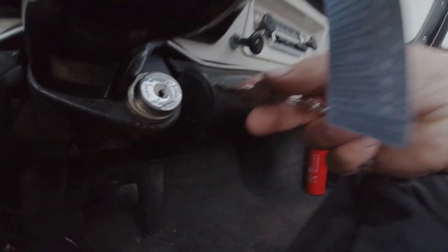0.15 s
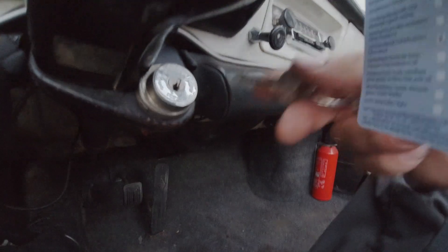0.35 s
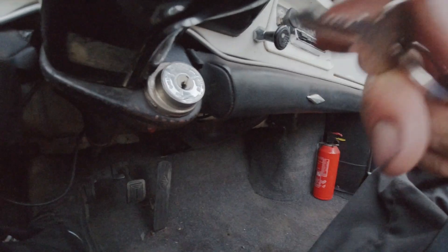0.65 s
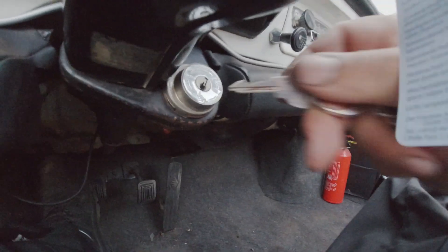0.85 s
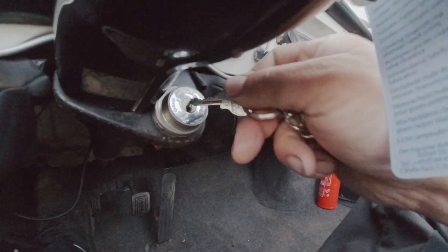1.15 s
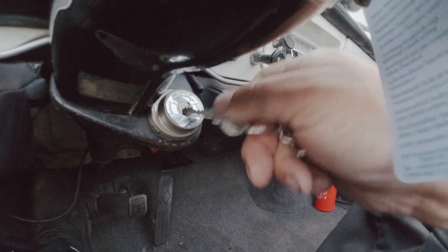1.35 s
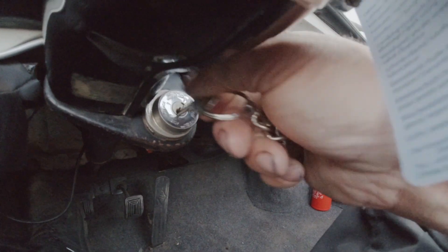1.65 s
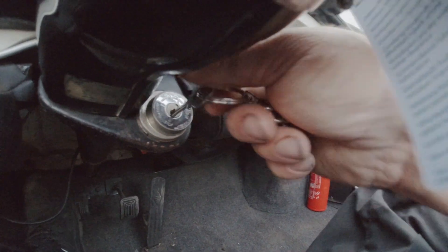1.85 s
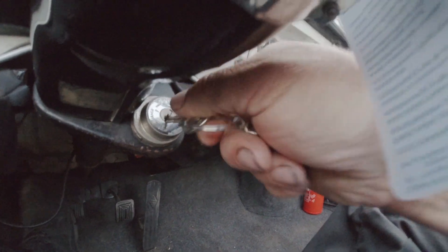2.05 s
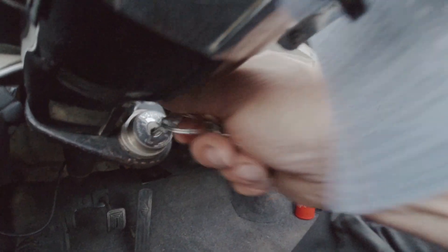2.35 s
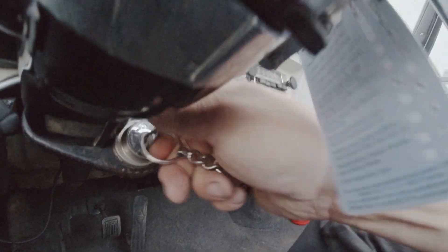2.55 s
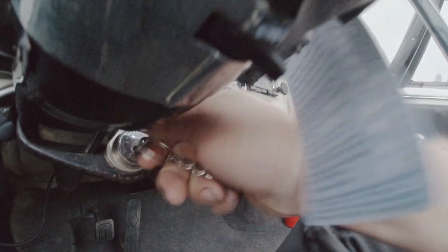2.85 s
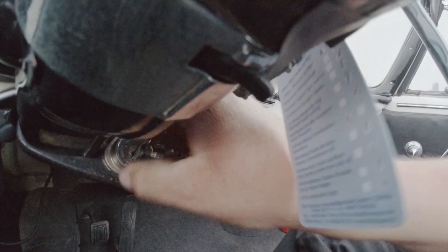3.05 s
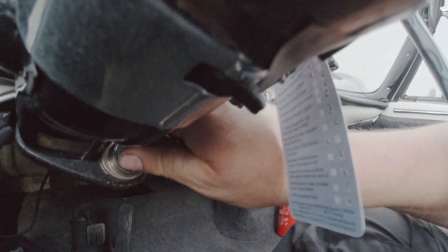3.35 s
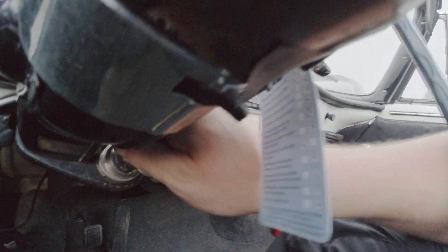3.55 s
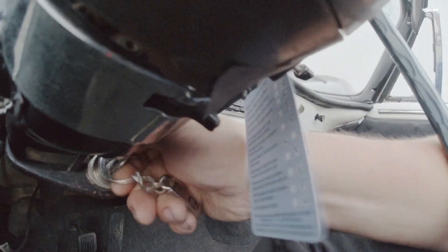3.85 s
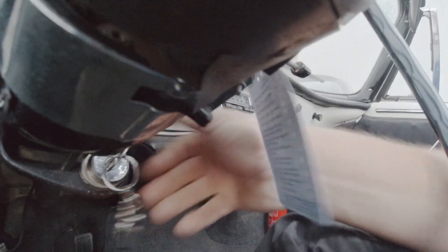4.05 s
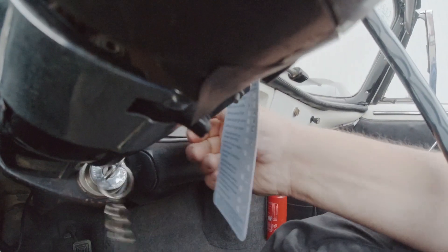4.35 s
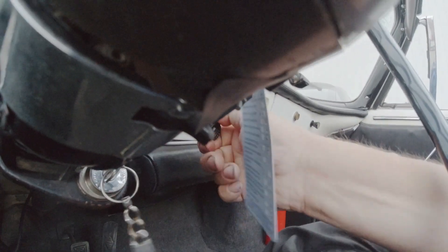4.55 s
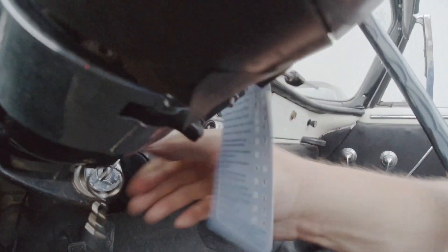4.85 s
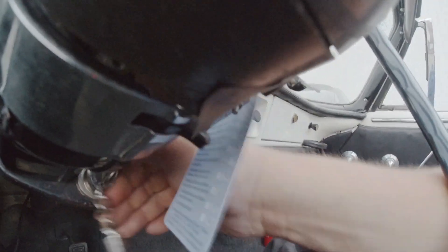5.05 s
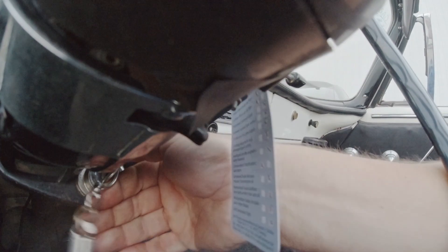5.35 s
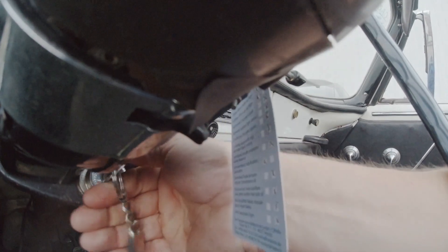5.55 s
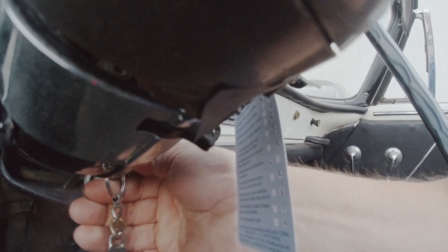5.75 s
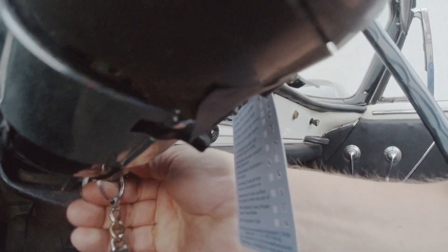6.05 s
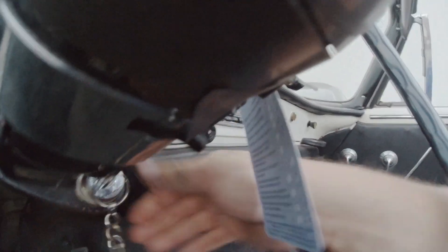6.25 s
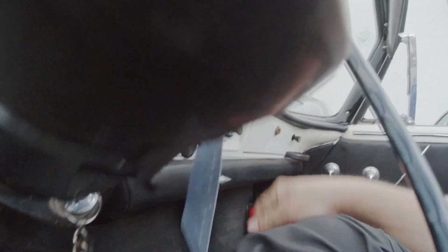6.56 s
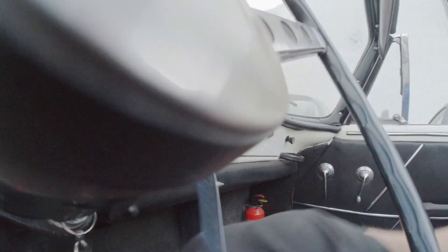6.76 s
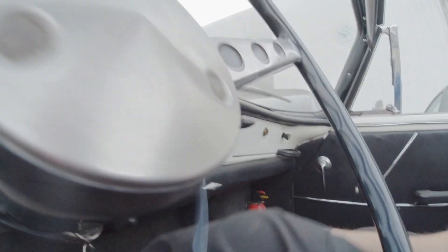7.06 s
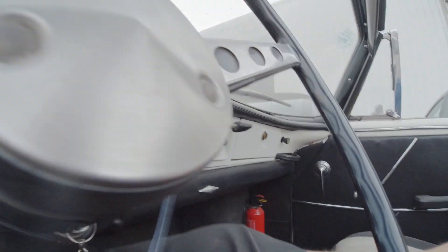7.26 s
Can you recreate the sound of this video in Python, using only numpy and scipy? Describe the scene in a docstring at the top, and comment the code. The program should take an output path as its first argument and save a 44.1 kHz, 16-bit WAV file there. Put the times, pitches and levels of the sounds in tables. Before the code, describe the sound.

Close lock clicks and dull column thuds inside a small car, a short starter grind, a sharp knock, then a flaring engine settles to fast idle.

```python
"""In still air inside a small old car, an arm moves, a key scrapes at the ignition lock and the column thuds.
Pins click, the barrel ticks and clunks and the key ring jingles: shaped noise and ringing modes.
The starter then jolts, grinds and whines: resonant noise and climbing sine partials.
The engine catches with a sharp knock: firing pulses and a tone at their rate flare, then climb to a fast idle.
Last, a throbbing pair of low tones makes the cabin boom."""
import sys
import numpy as np
from scipy import signal
from scipy.fft import rfft, irfft, next_fast_len
from scipy.io import wavfile
from scipy.ndimage import uniform_filter1d, map_coordinates

SR = 44100
rng = np.random.default_rng(int(sys.argv[2]) if len(sys.argv) > 2 else 0)


def transcribe(signal):
    """Save signal, clipped to [-1, 1], as a 16-bit WAV file at the path in sys.argv[1]."""
    frames = np.atleast_2d(signal).T
    limited = np.clip(frames, -1, 1)
    pcm = np.round(limited * 32767).astype(np.int16)
    wavfile.write(sys.argv[1], SR, pcm)


N = 326781
T = np.arange(N) / SR

# Tone of the still air. Each row: frequency in Hz, gain in dB.
AIR_SPECTRUM = [(20, -12.5), (60, 2), (200, -11.5), (700, -22), (4500, -38), (9000, -72.5)]
AIR_DB = -54.5

# The arm reaches for the lock, feeds the key in, turns it, lets go, draws back.
# Each row: start in seconds, length in seconds, rumble level in dB, rubbing level in dB.
MOVES = [(-0.1, 0.12, -29.5, -39), (0.21, 0.54, -41, -60), (1.581, 0.36, -48.5, -56.5),
         (2.012, 0.71, -42, -60.5), (2.74, 0.66, -36.5, -49.5), (3.284, 0.9, -46.5, -51.5),
         (4.474, 0.57, -47, -67)]
# Tone of the rumble and of the rubbing. Each row: frequency in Hz, gain in dB.
RUMBLE_SPECTRUM = [(20, 4), (62, 5.5), (200, -2), (700, -66.5)]
RUB_SPECTRUM = [(200, 11.5), (600, 2.5), (1500, -3.5), (4800, -11.5), (11000, -73.5)]
MOVE_ATTACK_S, MOVE_RELEASE_DB_PER_S = 0.081, 60
# Tone of cloth sliding as the arm reaches forward. Each row: frequency in Hz, gain in dB.
SLIDE_SPECTRUM = [(5000, -14), (8300, -18.5), (9600, 1.5), (12000, -36)]
SLIDE_START_S, SLIDE_LENGTH_S, SLIDE_DB = 0.574, 0.68, -59

# Key, fingers and paper tag scrape.
# Each row: centre in seconds, length in seconds, dull level in dB, bright level in dB.
SCRAPES = [(0.01, 1, -67, -55.5), (0.615, 0.057, -43.5, -47.5), (0.718, 0.058, -48, -45),
           (0.972, 0.19, -55.5, -57.5), (1.215, 0.089, -60, -45.5), (1.402, 0.021, -62, -49.5),
           (1.429, 0.053, -42.5, -63), (1.998, 0.11, -47.5, -47), (2.563, 0.11, -41.5, -45),
           (3.998, 0.12, -41, -54.5), (4.547, 0.14, -40.5, -56), (4.634, 0.094, -39, -44.5)]

# The hand bumps the steering column; near 4.02 s the falling key ring strikes its shroud instead. Each row:
# time in seconds, sway level in dB, shroud level in dB.
THUDS = [(0.089, -24, -39.5), (0.312, -31, -34.5), (0.383, -30, -36.5), (0.442, -26, -50),
         (0.517, -24, -37.5), (0.695, -27, -37.5), (2.017, -24.5, -28.5), (2.285, -20.5, -33),
         (2.367, -25.5, -34.5), (2.567, -23, -28), (2.705, -23, -36), (3.085, -19.5, -32),
         (3.163, -21.5, -31), (4.016, -41, -30.5), (4.648, -36.5, -37.5), (4.847, -39.5, -36)]
# Modes of the column's sway and drumming. Each row: frequency in Hz, level in dB, t60 in seconds.
COLUMN_LOW = [(62.6, 4.5, 0.31), (82, -10, 0.12)]
COLUMN_HIGH = [(189.9, 5.8, 0.14)]

# The hollow lock housing. Each row: frequency in Hz, width in Hz, gain in dB.
HOUSING = [(662, 47.2, 16.5)]
# Resonances of the lock barrel. Each row: frequency in Hz, gain in dB.
BARREL = [(955, 3.5), (1279, -1), (1745, -6.5), (2066, -8.5), (2650, -12.5), (3274, -14.5), (4790, -26.5)]
BARREL_WIDTH_HZ = 290
# Pins drop into the key's notches. Each row: time in seconds, level in dB.
PINS = [(1.977, -37.5), (2.766, -45), (2.786, -36), (2.835, -35.5)]
# The key's teeth tick lightly on the lock. Each row: time in seconds, level in dB.
TICKS = [(0.597, -41), (1.493, -32.5), (1.779, -39), (1.84, -38), (2.111, -36), (2.351, -39.5),
         (2.695, -38.5), (3.583, -30.5), (3.94, -35), (5.196, -37.5)]
# The barrel clunks against its stops. Each row: time in seconds, level in dB.
CLUNKS = [(1.282, -31.5), (1.689, -31.5), (2.13, -38.5), (2.175, -27.5), (2.303, -43), (2.316, -31),
          (2.574, -30), (2.723, -38.5), (2.753, -32.5), (2.794, -31), (2.863, -19.5), (2.939, -44.5),
          (2.977, -24.5), (3.029, -30), (3.286, -32.5), (3.299, -23.5), (3.671, -46), (3.76, -54),
          (3.99, -21)]
# A clunk of CLUNK_DB stirs the housing HOLLOW_DB above it; harder or softer ones only shift it by a share.
CLUNK_DB, HOLLOW_DB, HOLLOW_FOLLOWS = -30, 4, 0.34
TICK_HOLLOW_DB = -4.5   # ticks hardly stir the housing

# The key rings clash. Each row: time in seconds, level in dB, small and large ring in dB relative to it.
JINGLES = [(2.567, -28.5, -14, -18), (2.595, -38.5, -42, -19), (3.58, -27.5, 15.5, -4.5),
           (3.985, -28.5, -18, -21), (4.131, -44, -2, -12), (4.282, -34, -36, 4), (4.305, -61, -30, 4),
           (4.44, -55.5, -34, 1)]
# Modes of the small and the large ring. Each row: frequency in Hz, level in dB, t60 in seconds.
SMALL_RING = [(3420, -33, 0.21), (4820, -19.5, 0.069), (12430, -17.5, 0.13), (14870, -28.5, 0.11)]
LARGE_RING = [(2505, -6, 0.14), (3830, 0.5, 0.041), (4520, 1.5, 0.04)]
# Links of the dangling fob chain clink. Each row: time in seconds, level in dB.
LINKS = [(4.438, -55.5), (4.531, -48.5), (5.197, -36), (5.213, -45), (5.328, -61), (5.505, -64)]
# Modes of the chain. Each row: frequency in Hz, level in dB.
CHAIN = [(3460, -3), (5093, -2), (5790, -5), (9383, -7.5)]
CHAIN_T60_S = 0.085

# Knocks from the engine bay. Each row: time in seconds, level in dB, centre in Hz, t60 in seconds.
KNOCKS = [(5.797, -37.5, 4300, 0.09), (6.2567, -24, 2070, 0.016), (6.7405, -34.5, 1360, 0.023)]
KNOCK_WIDTH_HZ, KNOCK_CUT_HZ = 610, 7800

# The starter: a surge of torque as the pinion slams in, then cranking until the engine takes over.
START_S, SURGE_ATTACK_S, SURGE_HOLD_S, SURGE_RELEASE_DB_PER_S = 5.765, 0.043, 0.066, 148
CRANK_S, CRANK_RELEASE_DB_PER_S = 0.33, 133.5
SURGE_JOLT_DB, CRANK_JOLT_DB, CRANK_PUFF_DB = -25, -34, -20.5
MESH_DB, MESH_RELEASE_DB_PER_S, WHIRR_DB = -31.5, 295, -51   # the teeth grind as they mesh, then whirr
# Resonances of the jolted block, the gear teeth and the outrun teeth.
# Each row: frequency in Hz, width in Hz, gain in dB.
JOLT = [(71, 36, 1), (200.3, 24, -4.5), (252.4, 25, -3)]
GEARS = [(966, 180, 11), (1330, 210, 3), (1970, 230, 4.5)]
OVERRUN = [(3135, 62, 20)]
OVERRUN_START_S, OVERRUN_HOLD_S, OVERRUN_RELEASE_DB_PER_S, OVERRUN_DB = 6.04, 0.084, 53, -48
# The whine spins up. Each row: time in seconds, base pitch in Hz before it wavers.
WHINE = [(5.79, 500), (5.94, 951), (6.1, 1030)]
# Its partials. Each row: multiple of the base pitch, mean level in dB.
WHINE_PARTIALS = [(1, -44.5), (1.54, -50)]
WHINE_HOLD_S = 0.23
WHINE_WAVER, WHINE_ROUGH = 0.0253, 1.2   # share of the pitch, radians of phase

# A body panel booms once the idle is fast; its pitch starts low and settles.
BOOM_START_S, BOOM_ATTACK_S, BOOM_HOLD_S, BOOM_RELEASE_DB_PER_S = 6.37, 0.08, 0.733, 90.5
BOOM_DB, BOOM_GROWTH_DB_PER_S = -24, 8
THROBS_PER_S, THROB_DB = 17.5, -9
BOOM_HZ, BOOM_SAG_HZ, BOOM_SETTLE_S = 174.9, 28, 0.1495

# Engine speed. Each row: time in seconds, firings per second before they waver.
SPEED = [(6.05, 43.4), (6.174, 45.9), (6.28, 39.6), (6.446, 47), (7.09, 54.4), (7.41, 57)]
# Relative strength of the four cylinders in firing order. Each entry: level in dB.
CYLINDERS_DB = [6, -0.5, 4.5, 1.5]
# Tone of the exhaust, the valve clatter and the intake. Each row: frequency in Hz, gain in dB.
EXHAUST_SPECTRUM = [(26, -6.5), (55, 7.5), (78, 11), (128, -9), (165, -1), (280, -15), (375, -18.5),
                    (600, -80.5)]
CLATTER_SPECTRUM = [(400, 3), (650, 5), (1700, 0.5), (5500, -9.5), (7800, -58), (15000, -41)]
INTAKE_SPECTRUM = [(6500, 6), (10000, 13.5), (13000, -14)]
# Resonance of the valve cover. Each row: frequency in Hz, width in Hz, gain in dB.
VALVE_COVER = [(2037, 91, 0.82)]
# The engine catches, flares once and settles.
CATCH_S, CATCH_RISE_S = 5.96, 0.19
FLARE_S, FLARE_WIDTH_S = 6.24, 0.066
TONE_DB, EXHAUST_DB, CLATTER_DB = -19.5, -22, -41   # before flare and settling
FLARE_TONE_DB, FLARE_EXHAUST_DB = 9.5, 2   # added at the top of the flare
EXHAUST_SETTLE_DB_PER_S, CLATTER_SETTLE_DB_PER_S = 0.85, 5
INTAKE_DB, INTAKE_WIDTH_S = -57, 0.26   # air hisses in around the flare

# Passing resonances of loose parts: their width and how often they change.
SHIFT_WIDTH_HZ, SHIFTS_PER_S = 150, 20
# Stereo width. Each row: frequency in Hz, side minus mid in dB.
WIDTH = [(100, -36.5), (300, -16), (1400, -7.5), (2800, 0.5)]
CUTOFF_HZ = 15900


def from_db(db):
    """Decibels to gain."""
    return np.exp(np.asarray(db) * (np.log(10) / 20))


def rms_one(x):
    """Scale to rms 1."""
    return x / np.sqrt(np.mean(x ** 2) + 1e-20)


def in_time(rows):
    """Each column of a curve at every sample."""
    s, *columns = np.transpose(rows)
    return [np.interp(T, s, c) for c in columns]


def colour(x, spectrum):
    """Filter by (Hz, dB) points joined on a log-frequency axis."""
    size = next_fast_len(N + SR // 10)
    hz, db = np.transpose(spectrum)
    bins = np.maximum(np.arange(size // 2 + 1) * SR / size, 1)
    gain = from_db(np.interp(np.log(bins), np.log(hz), db))
    return irfft(rfft(x, size) * gain, size)[..., :N]


def band(x, edges_hz, kind):
    """Butterworth filter of design order 2."""
    sections = signal.butter(2, edges_hz, kind, fs=SR, output="sos")
    return signal.sosfilt(sections, x + 1e-18)   # the tiny offset keeps silence fast to filter


def drift(rate):
    """Slow chance with spread 1, drawn anew `rate` times a second."""
    knots = rng.standard_normal(2000)
    return rms_one(np.interp(T * rate, np.arange(len(knots)), knots))


def grains(spread_db):
    """Dense tiny contacts of uneven size; rms 1."""
    hiss = rng.standard_normal(N)
    sizes = np.repeat(rng.standard_normal(N // 32 + 1), 32)[:N]
    return rms_one(hiss * from_db(spread_db * sizes))


def shifting(x, spread_db, size=512):
    """Loose parts touch at ever new spots, so narrow resonances come and go, each on its own; rms 1."""
    hz, s, cells = signal.stft(x, SR, nperseg=size)
    places = np.meshgrid(hz / SHIFT_WIDTH_HZ, s * SHIFTS_PER_S, indexing="ij")
    chance = rng.standard_normal((size, size))
    db = spread_db * map_coordinates(chance, places, order=1, mode="wrap")
    return rms_one(signal.istft(cells * from_db(db), SR)[1][:N])


def resonate(x, peaks):
    """Parallel resonances (Hz, width in Hz, dB) with alternating signs."""
    out = 0
    for k, (hz, width, db) in enumerate(peaks):
        r = np.exp(-np.pi * width / SR)
        poles = [1, -2 * r * np.cos(2 * np.pi * hz / SR), r * r]
        gain = (-1) ** k * from_db(db) * (1 - r * r) / 2
        out = out + gain * signal.lfilter([1, 0, -1], poles, x + 1e-18)
    return out


def clicks(times, db):
    """One impulse per contact."""
    out = np.zeros(N)
    out[(times * SR).astype(int)] = from_db(db)
    return out


def strike(times, db, modes):
    """Every contact sets each mode ringing with a strength of its own."""
    out = 0
    for hz, mode_db, t60 in modes:
        r, w = 1e-3 ** (1 / (t60 * SR)), 2 * np.pi * hz / SR
        hits = clicks(times, db + mode_db + 2 * rng.standard_normal(len(times)))
        out = out + signal.lfilter([0, np.sin(w)], [1, -2 * r * np.cos(w), r * r], hits + 1e-18)
    return out


def dying(times, db, t60):
    """A faint swell leads into each hit, which then peaks and dies away."""
    hits = clicks(times, db) + 1e-18
    fall = signal.lfilter([1], [1, -1e-3 ** (1 / (t60 * SR))], hits)
    # the lead-in runs backwards in time, so a faint swell leads into each hit
    lead_in = signal.lfilter([1], [1, -np.exp(-1 / (0.006 * SR))], hits[::-1])[::-1]
    return uniform_filter1d(np.maximum(fall, 0.22 * lead_in), size=70)


def even(x, span):
    """Hold the level over `span` seconds at 1."""
    power = uniform_filter1d(x * x, max(int(span * SR), 2))
    return x / np.sqrt(np.abs(power) + 1e-12)


def envelope(start, attack, hold, release_db_per_s):
    """Gain that rises smoothly to 1, holds and dies away."""
    rise = np.sin(np.pi / 2 * np.clip((T - start) / attack, 0, 1)) ** 2
    drop_db = release_db_per_s * np.maximum(T - start - attack - hold, 0)
    return rise * from_db(-np.minimum(drop_db, 200))


def swell(peak_s, width_s):
    """A bell from 0 to 1 and back."""
    return np.exp(-np.minimum(((T - peak_s) / width_s) ** 2, 50))


def still_air():
    """Steady coloured noise, weighted to the bass."""
    return from_db(AIR_DB) * rms_one(colour(rng.standard_normal(N), AIR_SPECTRUM))


def handling():
    """Dull rumble and grainy rubbing of hand and clothes, and the hiss of sliding cloth."""
    start, length, rumble_db, rub_db = np.transpose(MOVES)
    moves = np.array([envelope(s, MOVE_ATTACK_S, span - MOVE_ATTACK_S, MOVE_RELEASE_DB_PER_S)
                      for s, span in zip(start, length)])
    # where moves overlap, the louder one is heard
    rumble_gain = np.max(from_db(rumble_db)[:, None] * moves, axis=0)
    rub_gain = np.max(from_db(rub_db)[:, None] * moves, axis=0)
    rumble = rumble_gain * even(colour(rng.standard_normal(N), RUMBLE_SPECTRUM), 0.022)
    rubbing = rms_one(colour(shifting(grains(spread_db=2.5), spread_db=6.5), RUB_SPECTRUM))
    rub = rub_gain * from_db(4.04 * drift(35)) * rubbing
    sliding = envelope(SLIDE_START_S, attack=0.04, hold=SLIDE_LENGTH_S, release_db_per_s=193)
    slide = from_db(SLIDE_DB) * sliding * rms_one(colour(rng.standard_normal(N), SLIDE_SPECTRUM))
    return rumble + rub + slide


def housing(x):
    """The hollow lock housing and the barrel within it ring as parallel resonances."""
    return resonate(x, HOUSING + [(hz, BARREL_WIDTH_HZ, db) for hz, db in BARREL])


def scrapes():
    """Short strokes of stick and slip swell and fade; the lock housing colours their bright part."""
    friction = shifting(rng.standard_normal(N), spread_db=4.5) * from_db(3.7 * drift(130))
    dull = even(band(friction, [230, 850], "band"), 0.055)
    bright = even(band(housing(friction), [1500, 5200], "band"), 0.065)
    out = np.zeros(N)
    for s, length, dull_db, bright_db in SCRAPES:
        on = np.abs(T - s) < length / 2
        stroke = np.cos(np.pi * (T[on] - s) / length)
        out[on] += stroke * (from_db(dull_db) * dull[on] + from_db(bright_db) * bright[on])
    return out


def lock_contacts():
    """Ticks and clunks as (s, dB, hollow body dB): the softer a clunk, the more hollow it sounds."""
    clunks = [(s, db, HOLLOW_DB - (1 - HOLLOW_FOLLOWS) * (db - CLUNK_DB)) for s, db in CLUNKS]
    return clunks + [(s, db, TICK_HOLLOW_DB) for s, db in TICKS]


def steering_column():
    """Soft pushes sway the column and pat its shroud at shifting spots; the lock's snaps drum on it too."""
    s, db, shroud_db = np.transpose(THUDS)
    snap_s, snap_db, hollow = np.transpose(lock_contacts())
    sway = band(strike(s, db, COLUMN_LOW), 110, "low")
    bump_s, bump_db = np.r_[s, snap_s], np.r_[shroud_db, snap_db + hollow - 9]
    patting = even(band(shifting(rng.standard_normal(N), spread_db=5.5), [180, 400], "band"), 0.018)
    pat = patting * dying(bump_s, bump_db - 3.5, t60=0.11)
    return sway + band(strike(bump_s, bump_db, COLUMN_HIGH) + pat, 650, "low")


def pins():
    """Each sprung pin drops with a tiny dry click of band-limited noise."""
    s, db = np.transpose(PINS)
    click = band(band(rng.standard_normal(N), [1900, 4700], "band"), 5000, "low")
    return rms_one(click) * dying(s, db, t60=0.008)


def snaps(rows, t60, body_t60, body_db, middle_db, edge_db):
    """Metal parts snap home and chatter in their housing; harder snaps are brighter."""
    s, db, hollow = np.transpose(rows)
    chatter = shifting(grains(spread_db=3.5), spread_db=3.5)
    ringing = housing(chatter)
    body = even(band(ringing, [450, 900], "band"), 0.0086)
    middle = even(band(band(ringing, [1100, 4600], "band"), 5200, "low"), 0.027)
    edge = rms_one(band(chatter, [3800, 6500], "band"))
    brightness_db = 4.3 * (db - db.max())
    return (body * dying(s, db + hollow + body_db, body_t60)
            + middle * dying(s, db + middle_db, t60)
            + edge * dying(s, db + brightness_db + edge_db, t60))


def key_ring():
    """Rings and chain clash with a bright rattle and ring on; the small ring adds a thin sizzle."""
    s, db, small, large = np.transpose(JINGLES)
    link_s, link_db = np.transpose(LINKS)
    clash = shifting(grains(spread_db=3), spread_db=6.5)
    rattling = rms_one(band(band(clash, [2000, 6200], "band"), 12000, "low"))
    rattle = rattling * dying(np.r_[s, link_s], np.r_[db, link_db], t60=0.075)
    sizzling = rms_one(band(clash, [11500, 15500], "band"))
    sizzle = sizzling * dying(s, db + 0.22 * small - 7.5, t60=0.11)
    chain = strike(link_s, link_db, [(hz, mode_db, CHAIN_T60_S) for hz, mode_db in CHAIN])
    rings = strike(s, db + small, SMALL_RING) + strike(s, db + large, LARGE_RING)
    return rattle + sizzle + chain + rings


def knocks():
    """Each knock is a short, dry crack of noise around a pitch of its own."""
    crack = rng.standard_normal(N)
    out = 0
    for s, db, hz, t60 in KNOCKS:
        pitched = band(resonate(crack, [(hz, KNOCK_WIDTH_HZ, 0)]), KNOCK_CUT_HZ, "low")
        out = out + rms_one(pitched) * dying(np.array([s]), db, t60)
    return out


def surge():
    """Gain of the starter's first heave against the standing engine."""
    return envelope(START_S, SURGE_ATTACK_S, SURGE_HOLD_S, SURGE_RELEASE_DB_PER_S)


def whine():
    """The starter's gears sing in rough, wavering partials that climb as it spins up."""
    hz, = in_time(WHINE)
    turns = np.cumsum(hz * (1 + WHINE_WAVER * drift(45))) / SR
    partials = 0
    for multiple, db in WHINE_PARTIALS:
        gain = from_db(db + 4.1 * drift(60))
        partials = partials + gain * np.sin(2 * np.pi * multiple * turns + WHINE_ROUGH * drift(200))
    return partials * envelope(START_S, SURGE_ATTACK_S, WHINE_HOLD_S, CRANK_RELEASE_DB_PER_S)


def starter():
    """The pinion jolts the block; its teeth grind, whirr and whine, then ring as the engine outruns them."""
    cranking = envelope(START_S, SURGE_ATTACK_S, CRANK_S, CRANK_RELEASE_DB_PER_S)
    meshing = envelope(START_S, SURGE_ATTACK_S, 0, MESH_RELEASE_DB_PER_S)
    outrun = envelope(OVERRUN_START_S, SURGE_ATTACK_S, OVERRUN_HOLD_S, OVERRUN_RELEASE_DB_PER_S)
    teeth = grains(spread_db=2.5)
    jolt_gain = from_db(SURGE_JOLT_DB) * surge() + from_db(CRANK_JOLT_DB) * cranking
    jolt = jolt_gain * even(band(resonate(rng.standard_normal(N), JOLT), 330, "low"), 0.055)
    whirr_gain = from_db(MESH_DB) * meshing + from_db(WHIRR_DB) * cranking
    whirr = whirr_gain * even(band(resonate(teeth, GEARS), 5800, "low"), 0.0072)
    overrun = from_db(OVERRUN_DB) * outrun * rms_one(resonate(teeth, OVERRUN))
    return jolt + whirr + whine() + overrun


def panel_boom():
    """The running engine shakes a body panel into a drone that throbs against a weaker tone just below it."""
    age = np.maximum(T - BOOM_START_S, 0)
    turns = np.cumsum(BOOM_HZ - BOOM_SAG_HZ * np.exp(-age / BOOM_SETTLE_S)) / SR
    main = np.sin(2 * np.pi * turns + 0.57 * drift(25))
    lower = np.sin(2 * np.pi * (turns - THROBS_PER_S * T) + 0.88 * drift(20))
    gain = from_db(BOOM_DB + BOOM_GROWTH_DB_PER_S * age + drift(30))
    drone = gain * (main + from_db(THROB_DB) * lower)
    return drone * envelope(BOOM_START_S, BOOM_ATTACK_S, BOOM_HOLD_S, BOOM_RELEASE_DB_PER_S)


def engine():
    """Uneven firings pulse through the exhaust with a tone; both flare. Valves clatter in step, air hisses in."""
    rate, = in_time(SPEED)
    age = np.maximum(T - CATCH_S, 0)
    running, flare = np.minimum(age / CATCH_RISE_S, 1), swell(FLARE_S, FLARE_WIDTH_S)
    firings = np.cumsum(rate * (1 + 0.0286 * drift(25))) / SR
    times = T[np.flatnonzero(np.diff(np.floor(firings)))]
    uneven_db = 7.4 * rng.uniform(-1.3, 1, len(times))
    pulses = clicks(times, np.resize(CYLINDERS_DB, len(times)) + uneven_db)

    gas = rms_one(pulses) + 1.05 * rng.standard_normal(N)
    blowing_db = EXHAUST_DB + FLARE_EXHAUST_DB * flare - EXHAUST_SETTLE_DB_PER_S * age
    blowing = running ** 2 * from_db(blowing_db)
    puffing = from_db(CRANK_PUFF_DB) * surge()   # the starter's heave pushes gas out too
    exhaust = (blowing + puffing) * even(colour(gas, EXHAUST_SPECTRUM), 0.2)
    tone = running ** 2 * from_db(TONE_DB + FLARE_TONE_DB * flare) * np.sin(2 * np.pi * firings)

    beat_db = 1.2 * np.cos(2 * np.pi * firings) + 1.87 * drift(97)
    valves = shifting(grains(spread_db=1.5), spread_db=4.5) * from_db(beat_db)
    covered = rms_one(colour(valves + resonate(valves, VALVE_COVER), CLATTER_SPECTRUM))
    clatter = np.sqrt(running) * from_db(CLATTER_DB - CLATTER_SETTLE_DB_PER_S * age) * covered
    breath = running * from_db(INTAKE_DB) * swell(FLARE_S, INTAKE_WIDTH_S)
    intake = breath * rms_one(colour(valves, INTAKE_SPECTRUM))
    return exhaust + tone + clatter + intake


def cabin(x, t60, wet_db):
    """Close, dense reflections off glass and painted steel, as decaying noise."""
    t = T[:SR // 2]
    echoes = rng.standard_normal(len(t)) * from_db(-60 * t / t60) * (t > .004)
    echoes = band(echoes / np.sqrt(np.sum(echoes ** 2)), [350, 7000], "band")
    return x + from_db(wet_db) * signal.fftconvolve(x, echoes)[:N]


def two_ports(x, diffuse):
    """Two close microphone ports: the left one leads in phase, and scattered sound differs between them."""
    scatter = rng.standard_normal(SR // 40)
    scattered = signal.fftconvolve(x, scatter / np.linalg.norm(scatter))[:N]
    leading = -signal.hilbert(x, next_fast_len(N + SR // 10))[:N].imag   # a quarter turn ahead
    side = colour((leading + diffuse * scattered) / np.hypot(1, diffuse), WIDTH)
    return np.array([x + side, x - side])


def scene():
    """Air, hands, lock and motor all sound within the cabin."""
    snapping = snaps(lock_contacts(), t60=0.033, body_t60=0.038, body_db=3.5, middle_db=4.5, edge_db=-13.5)
    lock = snapping + pins()
    hands = handling() + scrapes() + steering_column() + lock + key_ring()
    motor = knocks() + starter() + panel_boom() + engine()
    return two_ports(cabin(still_air() + hands + motor, t60=0.082, wet_db=-7.0), diffuse=0.52)


def record(dry):
    """The deepest bass and the top are cut."""
    top_cut = signal.ellip(10, .1, 80, CUTOFF_HZ, fs=SR, output="sos")
    return signal.sosfilt(top_cut, band(dry, 22, "high"))


dry = scene()
out = record(dry)
transcribe(out)
```